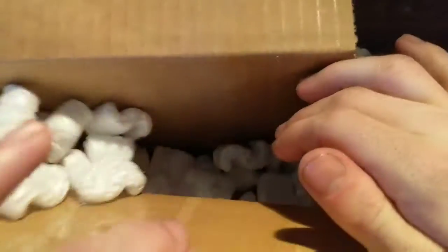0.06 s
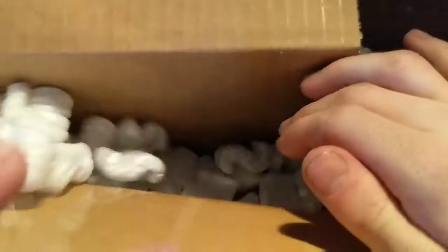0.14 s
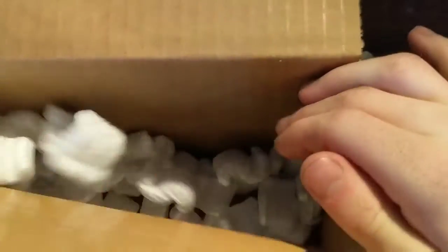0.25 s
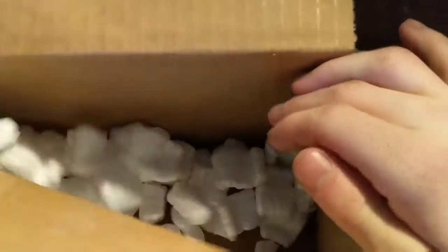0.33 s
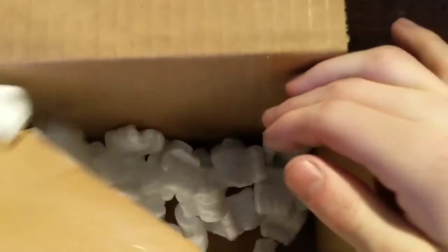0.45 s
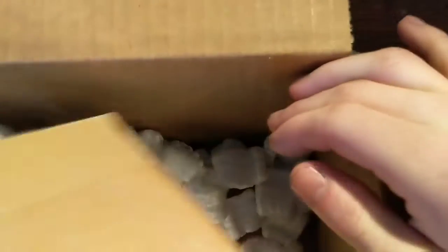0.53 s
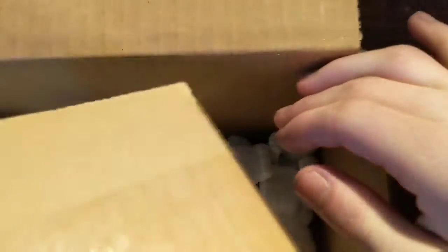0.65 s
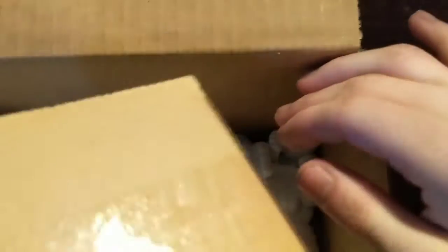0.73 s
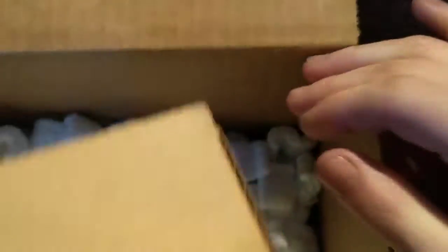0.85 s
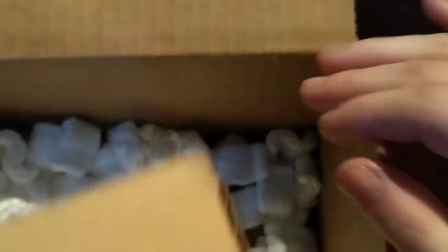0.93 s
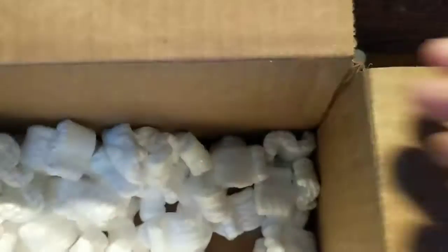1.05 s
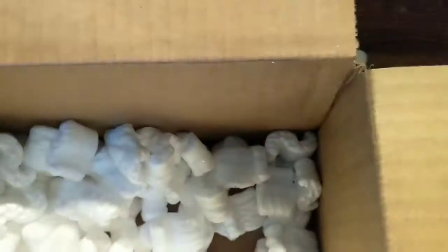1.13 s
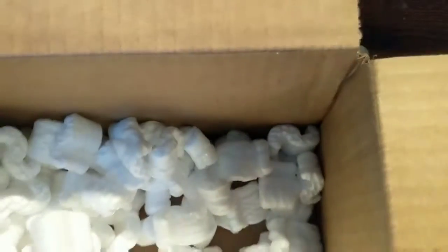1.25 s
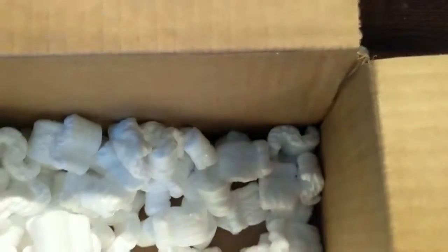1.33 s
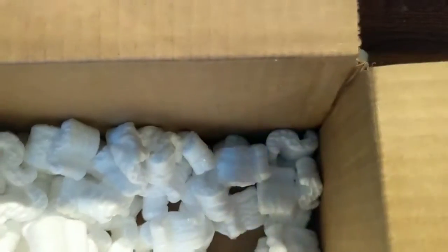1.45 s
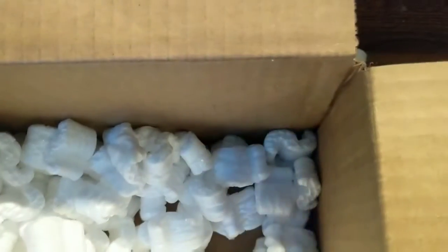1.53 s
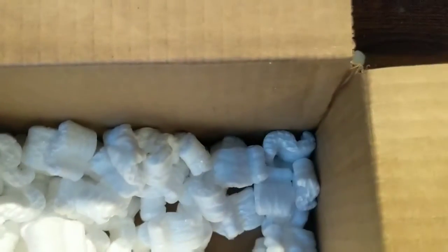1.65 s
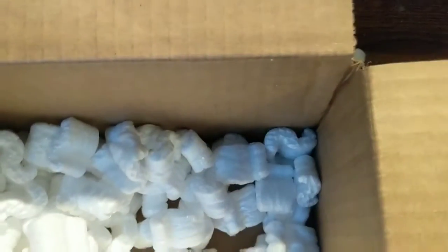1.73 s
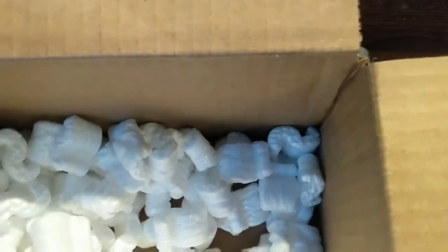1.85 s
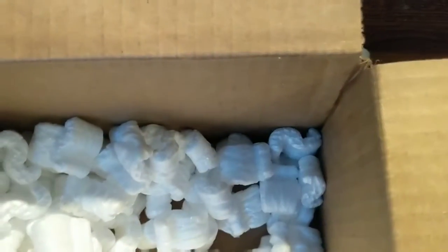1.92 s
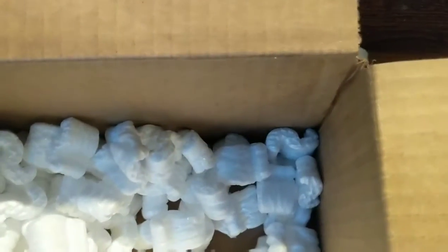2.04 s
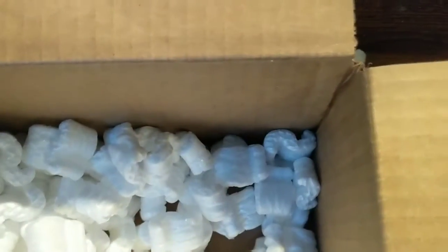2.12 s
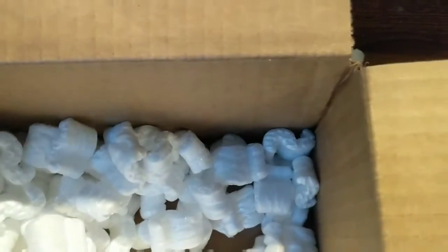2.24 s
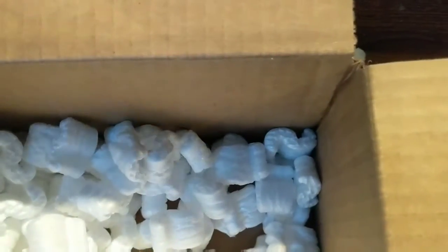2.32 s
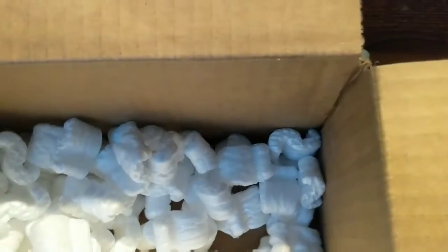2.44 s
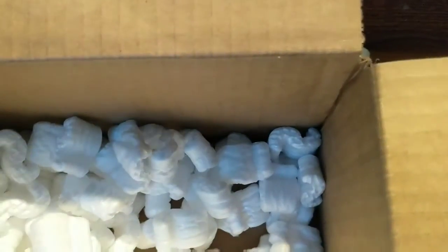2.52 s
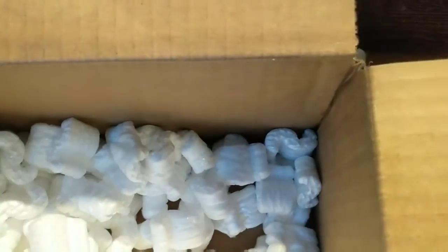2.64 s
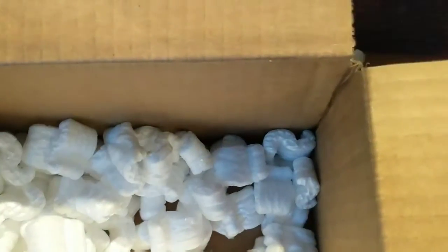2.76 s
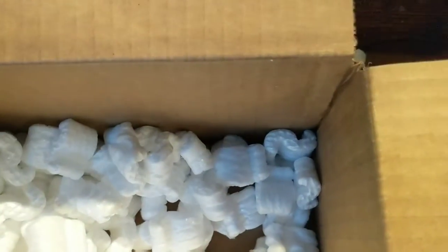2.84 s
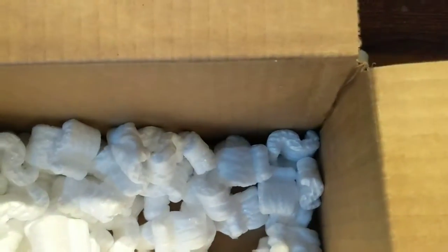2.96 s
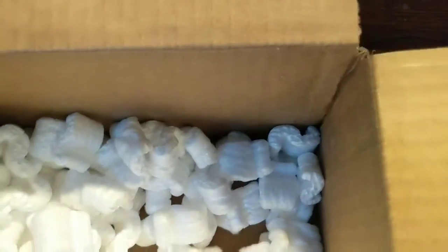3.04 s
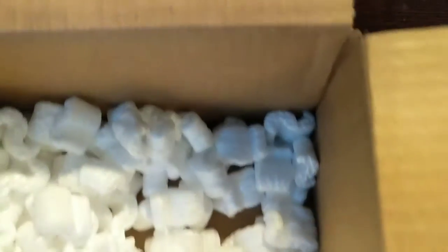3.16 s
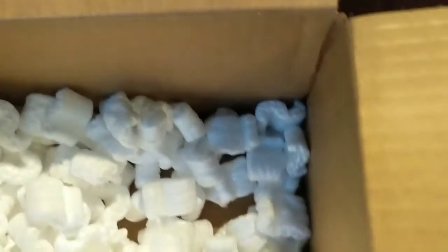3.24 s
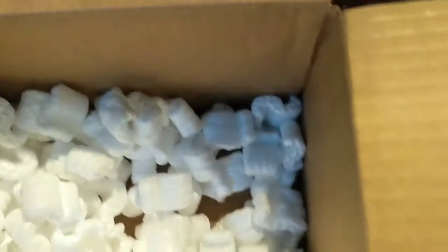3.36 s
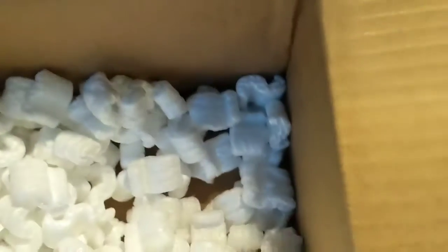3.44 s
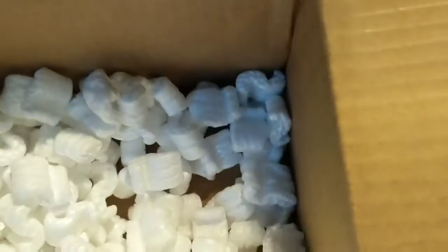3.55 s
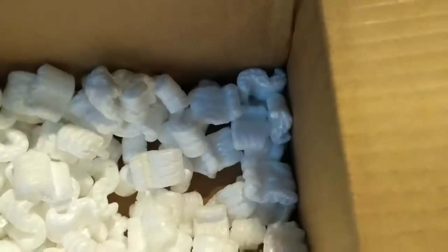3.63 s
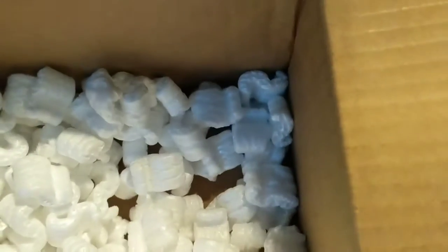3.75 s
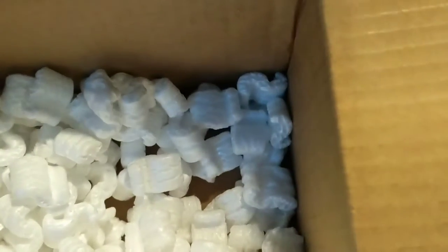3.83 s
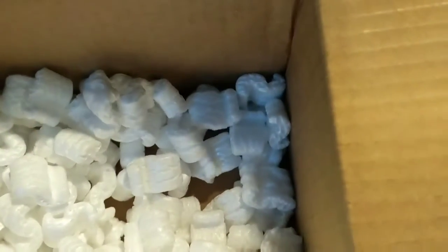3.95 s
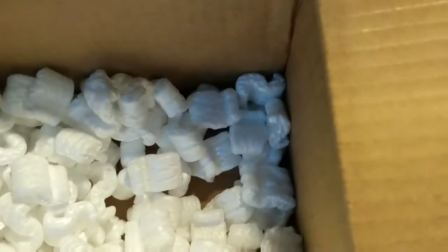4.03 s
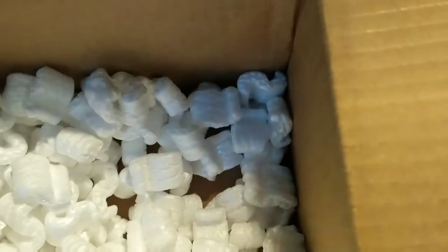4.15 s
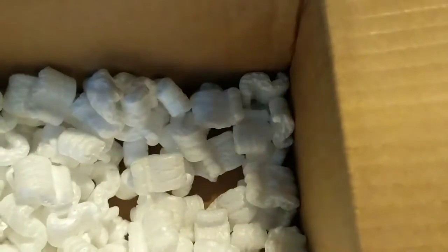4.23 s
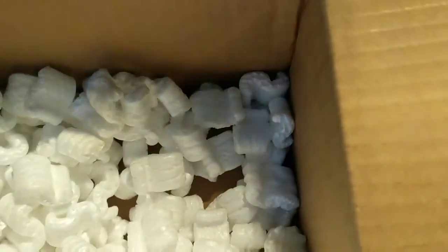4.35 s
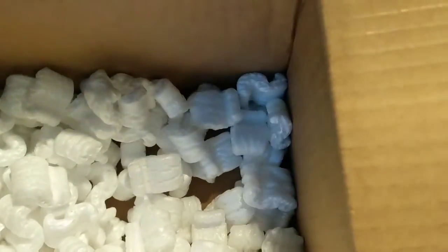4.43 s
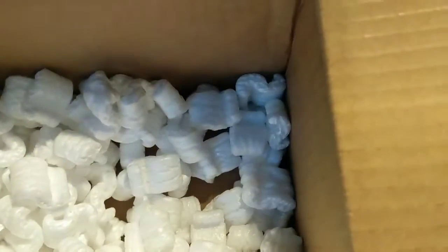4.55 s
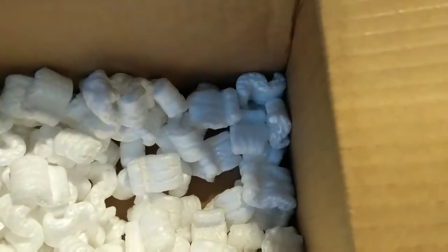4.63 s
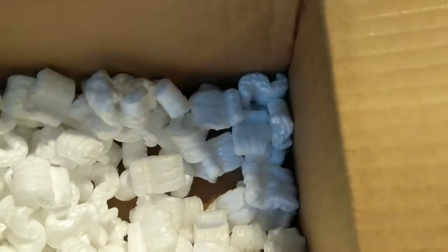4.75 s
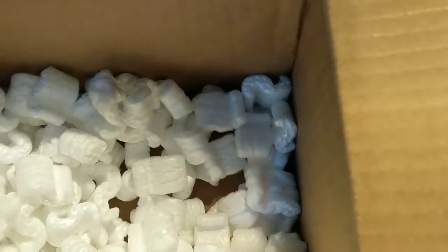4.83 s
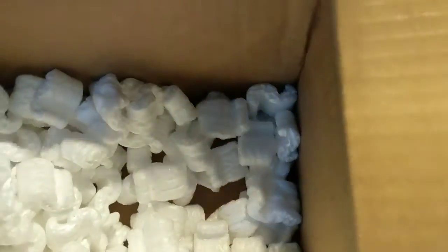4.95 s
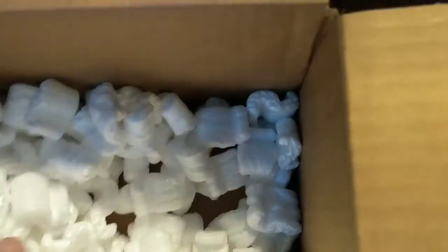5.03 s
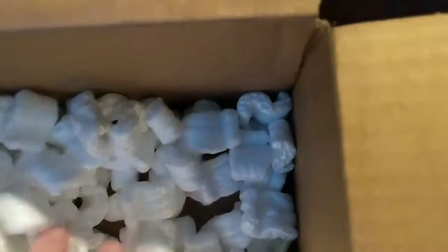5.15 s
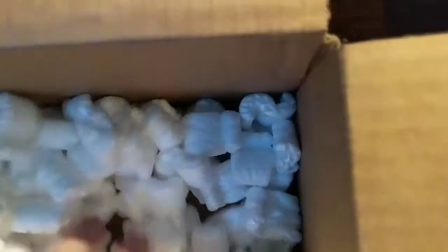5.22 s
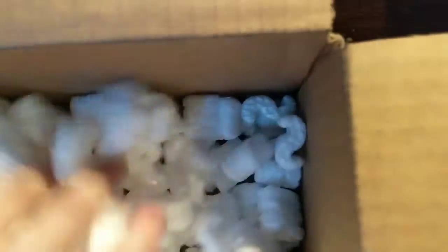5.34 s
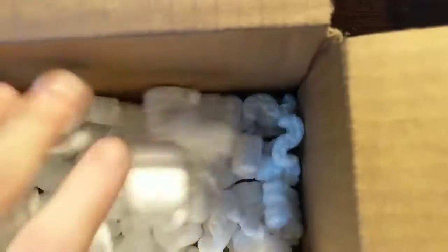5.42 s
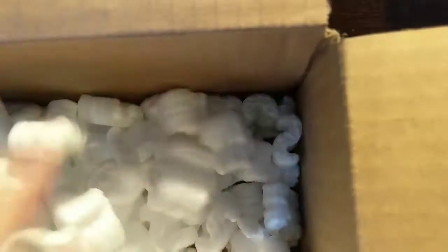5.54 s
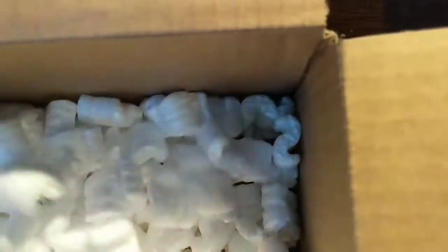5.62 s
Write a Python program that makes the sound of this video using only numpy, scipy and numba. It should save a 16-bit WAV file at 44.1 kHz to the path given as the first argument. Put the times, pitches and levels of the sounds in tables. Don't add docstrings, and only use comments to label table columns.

```python
import sys
import numpy as np
from scipy import signal
from scipy.fft import rfft, irfft
from scipy.io import wavfile
from scipy.ndimage import uniform_filter1d
from numba import njit

SR = 44100
rng = np.random.default_rng(int(sys.argv[2]) if len(sys.argv) > 2 else 0)


def decibels_to_gain(level_db):
    exponent = np.asarray(level_db, float) / 20
    return 10 ** exponent


def wav_out(sig):
    wavfile.write(sys.argv[1], SR, np.round(np.clip(np.atleast_2d(sig).T, -1, 1) * 32767).astype(np.int16))


N = 250488
T = np.arange(N) / SR

# (frequency [Hz], density [dB per Hz])
ROOM_SPECTRUM = [(15, -29), (25, 12.5), (64, 11.5), (195, 4.5), (439, 0.5), (1740, -11), (2990, -11),
                 (7510, -48), (14800, -20), (16000, -32)]
# (frequency [Hz], density [dB per Hz])
FOAM_COLOUR = [(18, -36), (30, -30), (59, 4.5), (149, -7), (204, -3), (287, -11), (394, -5.5), (449, -7),
               (649, -11), (1430, -12), (1760, -13), (7670, -13), (8740, -19.5), (14800, -28), (16000, -19)]
# (time [s], slip rate [Hz], level [dB])
HINGE_CREAK = [
    (1.15, 500, -56),
    (1.178, 460, -59.5),
    (1.24, 470, -54),
    (1.28, 460, -70),
]
# (time [s], drumming rate [Hz], level [dB])
FLAP_FLUTTER = [
    (.405, 196.2, -40),
    (.46, 186, -56),
    (.47, 188.5, -30.5),
    (.51, 148, -31.5),
    (.545, 108, -36),
]
# (time [s], level [dB], frequency [Hz], length [s], width [Hz])
SQUEAKS = [(0.085, -35, 7960, 0.03, 400), (0.171, -38, 8070, 0.084, 300), (0.302, -35, 7740, 0.042, 400),
           (0.33, -31, 6500, 0.043, 400), (0.097, -37, 4960, 0.042, 200), (0.098, -37, 2870, 0.05, 200),
           (0.221, -37, 2510, 0.044, 300), (0.397, -37, 4960, .013, 300), (0.168, -34.5, 1210, 0.0098, 200),
           (.355, -35.5, 1516, 0.013, 200), (0.117, -34.5, 3610, 0.034, 200),
           (0.539, -34.5, 3290, 0.012, 160), (0.59, -43, 3800, 0.0091, 260), (0.694, -45, 2920, 0.01, 200),
           (0.678, -46, 3620, 0.016, 200), (0.79, -46.5, 4660, 0.0087, 260),
           (0.92, -55.5, 3050, 0.018, 300), (1.045, -57, 3750, 0.012, 260), (1.33, -63, 8200, 0.011, 260),
           (1.42, -64, 7300, 0.018, 260), (2.368, -47, 6200, 0.0086, 260), (3.726, -46, 1360, 0.0078, 260),
           (3.722, -53, 5300, 0.0072, 800), (3.897, -41.5, 6330, 0.014, 500), (4.51, -70, 5370, 0.032, 400),
           (4.815, -38, 7930, 0.066, 500), (4.831, -32, 6770, 0.022, 400), (4.904, -37.5, 3150, 0.008, 400),
           (5.337, -23.5, 7600, 0.011, 500), (5.412, -27, 7000, 0.014, 500),
           (5.561, -30, 5370, 0.0028, 600)]
# (time [s], peak [dB], ring [Hz], t60 [s])
KNOCKS = [(0.173, -21, 453, 0.11), (0.537, -12, 1400, 0.03), (.538, -13.5, 645, 0.029),
          (0.692, -8.5, 1154, 0.025), (.743, -29, 710, 0.026), (.767, -28, 343, 0.032),
          (0.794, -24, 625, .03), (0.859, -26, 410, 0.029), (0.885, -22, 1080, 0.018),
          (.982, -30, 1130, 0.021), (1.013, -30, 1020, .025), (1.081, -25, 1170, 0.043),
          (1.1152, -24, 1280, 0.023), (1.118, -29, 143, 0.033), (1.533, -26, 990, 0.031),
          (1.67, -40, 410, 0.084), (2.272, -22.5, 820, 0.04), (3.05, -38.5, 112.6, 0.13),
          (3.168, -31, 63.6, 0.24), (3.221, -38, 85.5, 0.053), (3.604, -8.5, 147, 0.051),
          (3.943, -15.5, 80.6, 0.038), (4.917, -16, 552, 0.046), (5.064, -33, 102, 0.061),
          (5.11, -41, 88.8, 0.069), (5.281, -8, 228, 0.075), (5.2845, 9.5, 1370, 0.013),
          (5.283, -11, 520, 0.025), (5.344, -4.5, 927, 0.047), (5.375, -8.5, 800, 0.03),
          (5.534, -5.5, 750, 0.043), (3.225, -21, 147, 0.088), (3.243, -30, 152, 0.11),
          (5.482, -14, 460, 0.032), (5.507, -7.5, 612, 0.057), (.405, -15.5, 298, 0.028),
          (3.649, -24, 1130, 0.044), (3.216, -19, 1400, .02), (3.23, -14, 2020, .02),
          (5.589, -11.5, 596, 0.064), (5.424, -13, 218, 0.18), (5.48, -12, 224.3, 0.27),
          (5.509, -12.5, 218.6, 0.19), (5.57, -15, 499, 0.1)]

# (time [s], peak [dB], ring [Hz], cardboard part [dB]) Ticks and crackles as pieces settle,
# are dug through and swing with the flap; some fall in close pairs
LONE_SLIPS = [(0.534, -29, 9000, -41), (0.5841, -20, 7600, -41), (0.606, -28, 7740, -40),
              (0.6549, -27, 9300, -45), (0.795, -37, 7570, -50), (0.8395, -35, 5670, -44),
              (0.8844, -36, 6770, -42), (0.981, -44, 7000, -46), (1.073, -41, 7000, -52),
              (1.1155, -27, 2600, -37), (1.1717, -43, 6650, -48), (1.3224, -44, 7700, -52),
              (1.4112, -49, 7150, -65), (1.5358, -37, 4720, -37.5), (1.691, -51.5, 7500, -47),
              (2.013, -49, 6000, -67), (2.0857, -51, 5600, -55), (2.1355, -48, 3820, -56),
              (2.2712, -33, 4770, -44), (2.3364, -37, 7100, -46), (2.3984, -29, 4570, -48),
              (2.5, -46, 6800, -47), (2.6509, -43, 5800, -63), (2.7076, -39, 7900, -52),
              (2.732, -38, 3440, -44), (2.9397, -34, 7030, -49),
              (3.056, -40, 6560, -45.5), (3.2152, -38, 5000, -33), (3.2421, -21, 2510, -45),
           (3.5855, -11.5, 4100, -56), (3.781, -36, 6200, -43), (3.901, -30, 6430, -42),
           (4.329, -53, 8600, -55), (4.553, -43.5, 7600, -66), (4.73, -33, 9500, -46),
           (4.7908, -31, 3970, -31), (4.8355, -29, 6860, -31.5), (5.0047, -34, 7050, -50),
           (5.066, -25.5, 6540, -35), (5.104, -26.5, 4800, -27), (5.1632, -27, 7600, -34),
           (5.191, -22, 6300, -32), (5.209, -25, 7800, -47), (5.2836, -8.5, 7560, -17),
           (5.343, -5, 6200, -16.5), (5.505, -11, 6600, -39), (5.538, -10.5, 7700, -41.5),
           (5.5635, -11, 5400, -35),
              (0.68, -31, 7400, -45), (0.69, -36, 2850, -45), (1.5335, -46, 4740, -41),
           (2.2665, -46, 4730, -41), (.1035, -16, 7850, -40), (1.08, -36, 5400, -48),
           (1.1155, -32, 6000, -50), (1.093, -44, 7000, -55), (.95, -43, 6000, -55), (.926, -42, 7000, -52),
           (5.0825, -31, 7500, -55), (5.096, -34, 5000, -40), (5.349, -10, 7500, -30),
           (5.582, -25, 5000, -40), (4.953, -31, 7500, -45), (.743, -38, 2000, -46),
              (.544, -26, 7500, -40), (.6455, -31, 6760, -38), (.759, -37, 7570, -52), (.628, -31, 7000, -45),
            (2.261, -42, 5000, -46), (2.371, -33, 4060, -48), (2.492, -44, 3660, -50),
            (2.594, -47, 7050, -62), (2.673, -47, 5500, -52), (2.77, -47, 4760, -60),
            (4.83, -25, 6840, -45), (4.966, -32, 5000, -38), (4.994, -32, 13000, -48),
            (5.339, -10, 6130, -30), (5.517, -16, 11000, -40), (5.533, -12, 7600, -30),
            (5.589, -24, 8800, -45), (5.61, -28, 5000, -45), (5.626, -28, 9000, -48),
            (5.634, -26, 3500, -38), (5.655, -25, 7000, -45),
              (3.586, -16, 5900, -60),
              (.4767, -28, 6980, -42),
    (.498, -28, 7500, -42),
    (2.9425, -36, 6500, -55),
    (.544, -27, 3300, -48),
]
SLIPS = LONE_SLIPS

# (time [s], stirring of foam [dB], pressure on cardboard [dB], lightness of touch [dB])
HAND = [(0, -36, -40.5, -1), (.45, -35.5, -45.5, -1), (.7, -41.5, -57.5, 1.5), (.97, -55, -56, -1),
        (1.35, -69, -69, 0), (2.24, -70.5, -68.5, 2.5), (2.45, -54, -60, 0.5), (2.85, -66.5, -68.5, 0.5),
        (3.15, -64.5, -61.5, 1), (3.32, -47.5, -44.5, -1), (3.88, -50, -52.5, 0.5), (4.11, -68, -64.5, 3),
        (4.7, -69, -66, 4.5), (4.73, -42, -53, 4), (5.05, -51, -49.5, 0), (5.14, -53, -51, -4),
        (5.18, -49, -34.5, 0.5), (5.68, -47, -44, -1.5)]
# (peak time [s], level [dB], rise [s], fall [s])
STROKES = [(.11, -26.5, 0.051, 0.074), (.24, -25.5, 0.082, 0.12), (0.363, -25.5, 0.054, 0.048),
           (0.409, -27, 0.047, 0.0074), (.612, -32.5, 0.0051, 0.014), (.65, -35.5, .01, 0.031),
           (.8, -49, .015, .015), (.845, -49, .008, 0.022), (.92, -53, 0.063, 0.027),
           (1.082, -48.5, 0.019, 0.02), (1.13, -51.5, 0.015, 0.096), (1.245, -53, 0.023, 0.0085),
           (1.329, -52.5, 0.016, 0.02), (1.422, -57.5, 0.012, 0.028), (1.535, -51, 0.0042, 0.021),
           (1.87, -57.5, 0.16, 0.034), (2.04, -59.5, 0.012, 0.024), (2.279, -43, 0.0089, 0.016),
           (2.395, -37.5, 0.037, 0.018), (2.55, -54, .05, 0.045), (2.72, -56, 0.046, 0.046),
           (2.94, -55, 0.045, 0.034), (3.055, -59.5, 0.0087, 0.2), (3.24, -36.5, 0.023, 0.035),
           (3.54, -45.5, 0.15, 0.15), (3.665, -44, 0.02, .02), (3.762, -39.5, 0.0058, 0.01),
           (3.905, -44.5, 0.014, 0.022), (3.946, -40, 0.015, 0.026), (4.07, -58, 0.03, 0.02),
           (4.525, -60.5, 0.024, .04), (4.635, -55, 0.054, .012), (4.79, -31.5, 0.021, 0.037),
           (4.855, -25.5, 0.03, 0.047), (4.922, -26.5, 0.0066, 0.0076), (5.22, -24.5, 0.027, 0.48),
           (5.657, -50, 0.014, .03), (4.985, -41, 0.031, 0.052), (5.351, -17.5, 0.032, 0.032),
           (5.377, -18.5, 0.009, .008), (5.43, -18.5, 0.049, 0.069), (5.537, -39, 0.0074, 0.0076),
           (4.715, -53, .003, .02)]
# (peak time [s], level [dB], rise [s], fall [s], dullness [dB])
SCRAPES = [(.09, -36.5, 0.052, 0.052, -2), (0.391, -31.5, 0.36, 0.027, -5), (.5, -39.5, 0.055, 0.17, 7),
           (0.698, -39.5, 0.19, 0.019, 4), (1.12, -48, 0.048, 0.04, 3), (1.22, -57, 0.037, 0.054, 2),
           (1.534, -48.5, 0.004, 0.02, 14), (1.8, -55.5, 0.05, 0.032, 3.5),
           (1.855, -53.5, 0.064, 0.035, 1.5), (2.281, -45.5, 0.011, 0.017, -1.5),
           (2.397, -41.5, 0.048, 0.017, -4.5), (2.73, -64, 0.078, 0.044, -9),
           (3.24, -35.5, 0.03, 0.05, -3.5), (3.445, -38.5, 0.046, 0.066, 2.5), (3.64, -57, 0.02, 0.042, 0),
           (3.946, -40, 0.01, 0.036, 6), (4.791, -42, 0.038, 0.18, -8), (4.92, -42.5, 0.078, 0.013, -12.5),
           (5.108, -39.5, 0.031, 0.01, -1), (5.229, -33.5, 0.032, 0.04, -1.5),
           (5.278, -29, 0.019, 0.017, -6), (5.352, -25, 0.023, 0.022, -9), (5.379, -22, 0.01, 0.0065, 4),
           (5.488, -25.5, 0.14, 0.043, -1), (5.536, -29, 0.0066, 0.084, 3.5)]
# (peak time [s], level [dB], fall [s], weight [1 panel, 2 wall, 3 air])
SHOVES = [(.005, -38, 0.027, 2.4), (.1, -43, 0.1, 1.6), (.28, -38, 0.24, 1.07), (.36, -39, 0.15, 2.1),
          (0.519, -28.5, 0.028, 2.45), (.59, -41, 0.13, 1.5), (.7, -45, 0.036, 1.2),
          (.85, -47.5, 0.099, 1.58), (1.119, -46.5, 0.064, 1.83), (1.537, -42, 0.011, 1.44),
          (1.69, -54, 0.047, 1.37), (3.24, -24.5, 0.055, 3.2), (3.33, -36, 0.27, 3.8),
          (3.45, -40, 0.083, 1.62), (3.617, -28, 0.034, 1.72), (3.69, -44, 0.065, 2.46),
          (3.85, -42, 0.12, 3), (3.968, -36, 0.028, 1.73), (4.05, -47, 0.081, 2.6),
          (4.118, -54, 0.045, 1.3), (4.3, -44.5, 0.079, 3.84), (4.79, -41.5, 0.045, 3),
          (4.96, -35, 0.072, 2.84), (5.085, -28, 0.027, 3.04), (5.21, -37, 0.066, 0.82),
          (5.3, -31.5, 0.06, 1.9), (5.39, -27.5, 0.031, 2.76), (5.42, -38, 0.15, 2.9),
          (5.471, -23.5, 0.064, 0.68), (5.58, -29.5, 0.033, 1.43)]
# (time [s], depth [dB], half length [s])
PAUSES = [(0.43, 3.5, .008), (0.569, 8, 0.0097), (0.601, 3, 0.005), (0.756, 5, 0.0087), (0.816, 4.5, 0.014),
          (.965, 10, 0.011), (2.63, 4, 0.018), (2.328, 5, 0.0071), (2.388, 8.5, .005), (2.462, 5, .02),
          (0.73, 2, .012), (3.201, 1.5, .008), (3.367, 3.5, 0.02), (3.635, 3, 0.0084), (2.964, 0, 0.022),
          (5.058, 8, .009), (5.076, 1, .006), (5.326, 2.5, 0.011), (5.31, 1, .006), (5.393, 1.5, 0.0097),
          (5.466, 0.5, .006), (5.346, 8, 0.0016), (5.437, 2, .007), (5.525, 2.5, 0.0053), (5.552, 5, 0.008),
          (5.605, 4.5, 0.017)]


def unit(x):
    return x / np.sqrt(np.mean(x ** 2))


def smooth_twice(x, span):
    return uniform_filter1d(uniform_filter1d(x, span), span)


def curves(table):
    s, *columns = np.transpose(table)
    return [np.interp(T, s, c) for c in columns]


def colour(x, points):
    hz, db = np.transpose(points)
    size = 4096
    grid = np.maximum(np.arange(size // 2 + 1) * SR / size, 1)
    log_gain = np.log(decibels_to_gain(np.interp(np.log(grid), np.log(hz), db)))
    cepstrum = irfft(log_gain)
    cepstrum[1:size // 2] *= 2
    cepstrum[size // 2 + 1:] = 0
    impulse = irfft(np.exp(rfft(cepstrum)))[:size // 2]
    return signal.fftconvolve(x, impulse)[:N]


def band(x, lo_hz, hi_hz):
    edges = [lo_hz, min(hi_hz, .45 * SR)]
    return signal.sosfilt(signal.butter(3, edges, "band", fs=SR, output="sos"), x)


def walk(rate):
    hold_samples = int(SR / rate)
    levels = np.repeat(rng.standard_normal(3000), hold_samples)[:N]
    return unit(smooth_twice(levels, hold_samples))


@njit
def ring(start, hz, t60, size, n, sr):
    out = np.zeros(n)
    for k in range(len(start)):
        turn = np.exp(2j * np.pi * hz[k] / sr - np.log(1000) / (t60[k] * sr))
        z = size[k] + 0j
        for i in range(start[k], min(n, start[k] + int(t60[k] * sr))):
            z *= turn
            out[i] += z.imag
    return out


def room():
    drift_db = .4 * walk(6)
    return decibels_to_gain(-61.5 + drift_db) * unit(colour(rng.standard_normal(N), ROOM_SPECTRUM))


def flap(table, waver, rough_db, third):
    hz, db = curves(table)
    phase = 2 * np.pi * np.cumsum(hz * (1 + waver * walk(88.6))) / SR
    moving = (T > table[0][0]) & (T < table[-1][0])
    gate = uniform_filter1d(moving * 1., size=400)
    level = decibels_to_gain(db + 1.0 + rough_db * walk(57.9))
    return gate * level * (np.sin(phase) + third * np.sin(3 * phase))


def creak():
    squeal = flap(HINGE_CREAK, waver=0.015, rough_db=5.0, third=0.2)
    return squeal + flap(FLAP_FLUTTER, waver=0.025, rough_db=1.5, third=0.12)


def squeaks():
    out = np.zeros(N)
    rubs = rng.standard_normal((len(SQUEAKS), SR // 2))
    for (s, db, hz, length, width_hz), rub in zip(SQUEAKS, rubs):
        age = np.arange(int(2 * length * SR)) / SR / length
        voice = unit(band(rub, hz - width_hz / 2, hz + width_hz / 2)[-len(age):])
        swell = np.sin(np.pi * np.sqrt(age / 2))
        at = int(s * SR)
        out[at:at + len(age)] += decibels_to_gain(db) * swell * voice
    return out


def knocks():
    s, db, hz, t60 = np.transpose(KNOCKS)
    at = (s * SR).astype(np.int64)
    t60 = np.clip(t60, .005, .3)
    hit = np.zeros(N)
    for ratio, mode_db, t60_share in ((1, -10.5, 1), (1.6, -15.5, 0.28), (2.7, -8, 0.21)):
        hit += ring(at, hz * ratio, t60 * t60_share, decibels_to_gain(db + mode_db), N, SR)
    return smooth_twice(hit, 18)


def ticks():
    out = np.zeros(N + SR)
    t = np.arange(int(.08 * SR)) / SR
    rows = rng.standard_normal((len(SLIPS), 4, len(t)))
    for (s, db, hz, card_db), noise in zip(SLIPS, rows):
        crumple_s = .006 * decibels_to_gain(-.14 * (db + 30))
        grit = decibels_to_gain(16 * uniform_filter1d(noise[3], size=60))
        tail = grit * np.exp(-t / max(crumple_s, .001)) * (1 - np.exp(-t / 0.00065))
        fade = np.exp(-t / 0.00016) + min(crumple_s / 0.013, .8) * tail
        tone = 1.33 * np.sin(2 * np.pi * hz * t) * np.exp(-t / 0.00052)
        crack = band(fade * noise[0] + tone, hz / 1.86, hz * 1.65)
        top = band((fade + tail / 3) * noise[1], 2600, 22200)
        card = band(fade * noise[2], 243, 2180)
        at = int((s + 0.001108) * SR)
        for part, peak_db in ((crack, db), (top, 0.93 * db - 15), (card, card_db - 0.5)):
            out[at:at + len(t)] += decibels_to_gain(peak_db) * part / np.abs(part).max()
    return out[:N]


def swarm(lo_hz, hi_hz, slips, cycles, spread_db, hiss, count):
    at, pitch, luck, free = rng.random((count, 4)).T
    hz = lo_hz / 1.266 + pitch * (1.243 * hi_hz - lo_hz / 1.064)
    size = np.sqrt(hz) * decibels_to_gain(-spread_db * np.log(1 - .99 * luck))
    t60 = cycles / hz * (1 + 1.2 * free ** 8)
    grains = ring((at * N).astype(np.int64), hz, t60, size, N, SR)
    rub = unit(grains) + hiss * rng.standard_normal(N)
    rub = band(colour(rub, FOAM_COLOUR), lo_hz, hi_hz)
    slow_power = smooth_twice(rub ** 2, int(SR * max(.04, 5 / lo_hz)))
    return unit(slips * rub / np.sqrt(slow_power + 1e-18))


def swells(steady_db, s, db, rise, fall):
    power = decibels_to_gain(steady_db) ** 2
    for at, peak_db, up, down in zip(s, db, rise, fall):
        age = np.where(T < at, (at - T) / max(up, .002), (T - at) / max(down, .002))
        power = power + decibels_to_gain(peak_db) ** 2 * np.exp(-2 * np.minimum(age, 30) ** 1.44)
    return np.sqrt(power)


def hold(events, depth_db, lead):
    marks = np.zeros(N)
    marks[(np.transpose(events)[0] * SR).astype(int)] = 1
    hush = signal.lfilter([1], [1, -np.exp(-1 / (lead * SR))], marks[::-1])[::-1]
    return decibels_to_gain(-depth_db * np.minimum(hush, 1))


def pauses():
    return decibels_to_gain(-sum(db * np.exp(-((T - s) / half) ** 2) for s, db, half in PAUSES))


def foam_rustle(slips, stir_db, light_db):
    rustle = swells(stir_db, *np.transpose(STROKES))
    top = decibels_to_gain(-5.5 + light_db) * decibels_to_gain(-39.5) * (rustle / decibels_to_gain(-40.0)) ** 1.04
    foam = rustle * swarm(4200, 9080, slips, cycles=34, spread_db=2.5, hiss=.7, count=40000)
    foam += top * swarm(9270, 15000, slips, cycles=11.0, spread_db=3.0, hiss=0.87, count=40000)
    return foam


def card_scrape(slips, stir_db, press_db):
    s, db, rise, fall, dullness = np.transpose(SCRAPES)
    dull = swells(press_db, s, db + dullness / 2, rise, fall)
    bright = swells((stir_db + press_db) / 2 + 0.5, s, db - dullness / 2, rise, fall)
    card = dull * swarm(490, 1447, slips, cycles=12.0, spread_db=1.0, hiss=0.66, count=4500)
    card += bright * swarm(1492, 4106, slips, cycles=26, spread_db=3, hiss=.7, count=12000)
    return card


def box_boom(press_db):
    s, db, fall, weight = np.transpose(SHOVES)

    def effort(part_db, part_weight):
        return swells(press_db + part_db, s, db - 12 * (weight - part_weight) ** 2, 0.86 * fall, fall)

    panel, wall, air = effort(-4.5, 1), effort(-6.5, 2), effort(-7.5, 3)
    box = panel * swarm(252.6, 433.2, 1, cycles=43.0, spread_db=-4.0, hiss=0.079, count=1200)
    box += wall * swarm(111.5, 249.3, 1, cycles=11.0, spread_db=-5.0, hiss=0.56, count=800)
    box += air * swarm(46.3, 90.2, 1, cycles=15.3, spread_db=8.0, hiss=0.55, count=400)
    return box


def stirring():
    slips = decibels_to_gain(.8 * walk(60) + 1.4 * walk(160))
    stir_db, press_db, light_db = curves(HAND)
    rubbing = foam_rustle(slips, stir_db, light_db) + card_scrape(slips, stir_db, press_db)
    rubbing *= hold(SLIPS, depth_db=1.5, lead=0.0091) * pauses()
    box = hold(KNOCKS, depth_db=24.0, lead=0.0039) * box_boom(press_db)
    return decibels_to_gain(-3.5) * rubbing + decibels_to_gain(-2.5) * box


def scene():
    near = creak() + squeaks() + knocks() + ticks() + stirring()
    t = T[:int(.15 * SR)]
    scatter = rng.standard_normal(len(t)) * np.exp(-t / 0.031)
    wet = signal.fftconvolve(near, scatter / np.sqrt(np.sum(scatter ** 2)))[:N]
    return np.tile(near + decibels_to_gain(-9.5) * wet + room(), (2, 1))


def low_pass(x):
    return signal.sosfilt(signal.butter(12, 16480, fs=SR, output="sos"), x)


def record(dry):
    port_hz, port_width_hz = 7700, 1400
    port = signal.lfilter(*signal.iirpeak(port_hz, port_hz / port_width_hz, SR), dry)
    heard = dry + 0.3 * port
    heard = signal.sosfilt(signal.butter(2, 49, "high", fs=SR, output="sos"), heard)
    heard = np.tanh(1.3 * heard) / 1.3
    heard = signal.sosfilt(signal.ellip(10, .2, 70, 15900, fs=SR, output="sos"), heard)
    return low_pass(heard)


dry = scene()
out = record(dry)
wav_out(out)
```